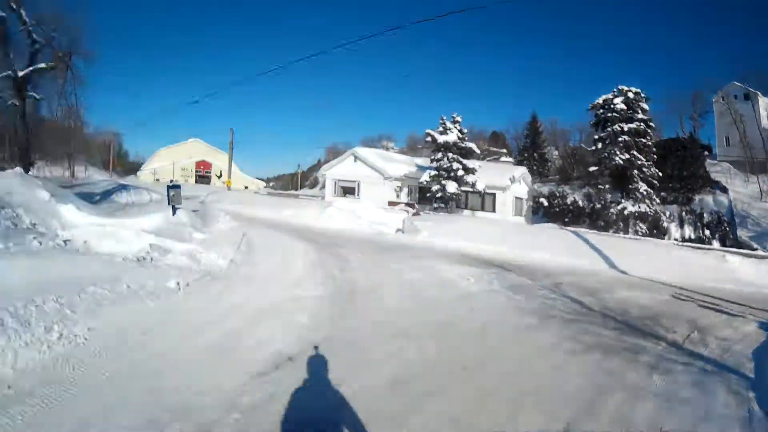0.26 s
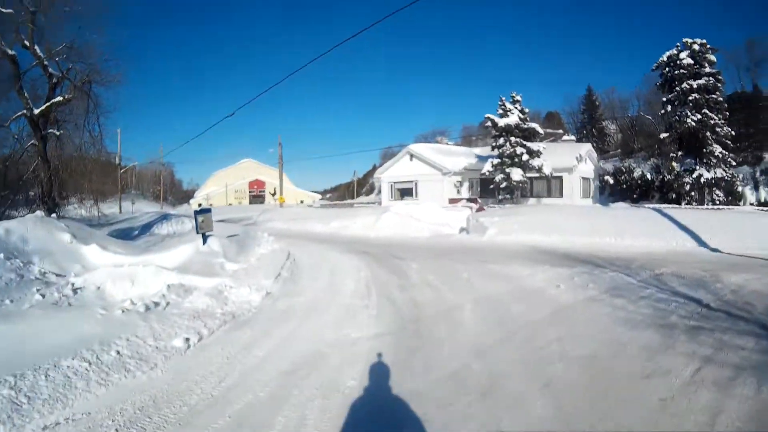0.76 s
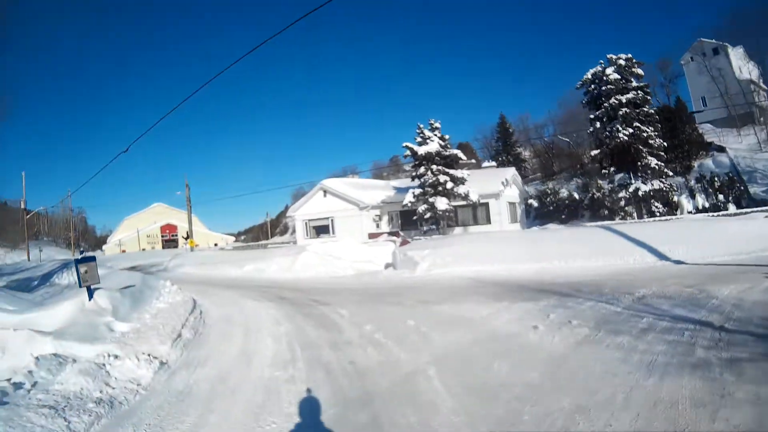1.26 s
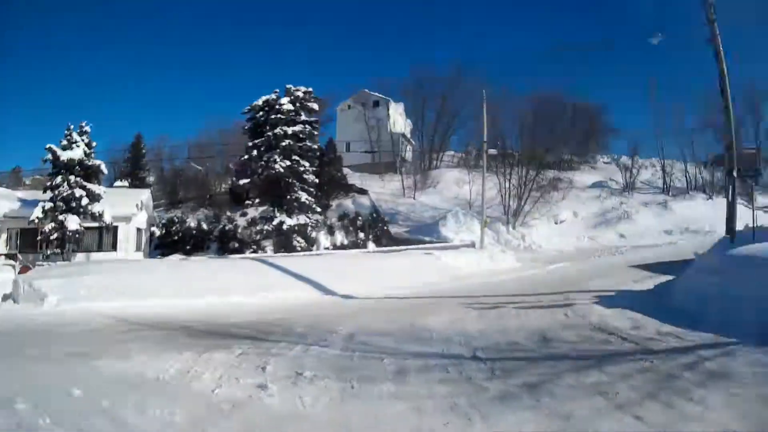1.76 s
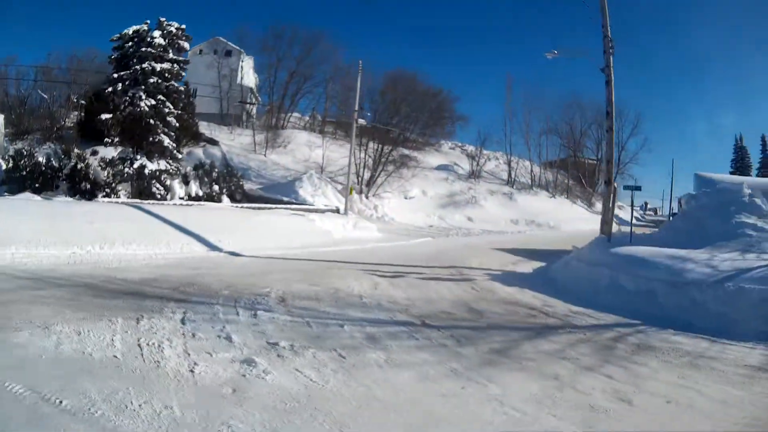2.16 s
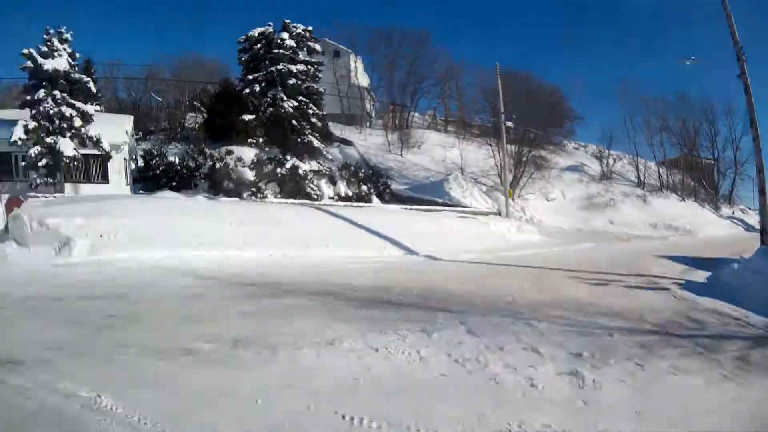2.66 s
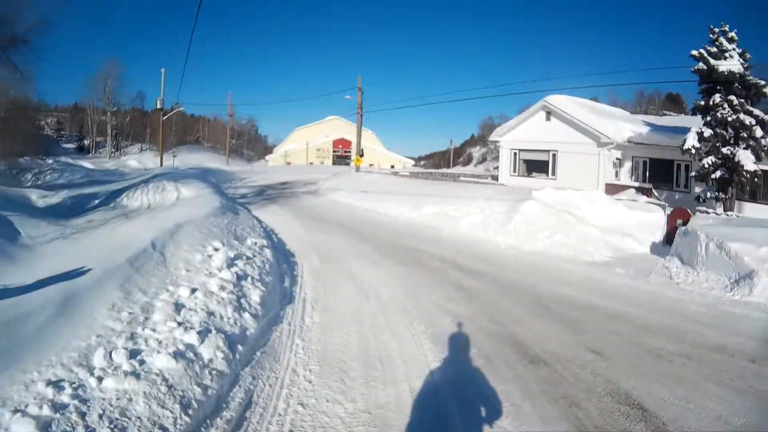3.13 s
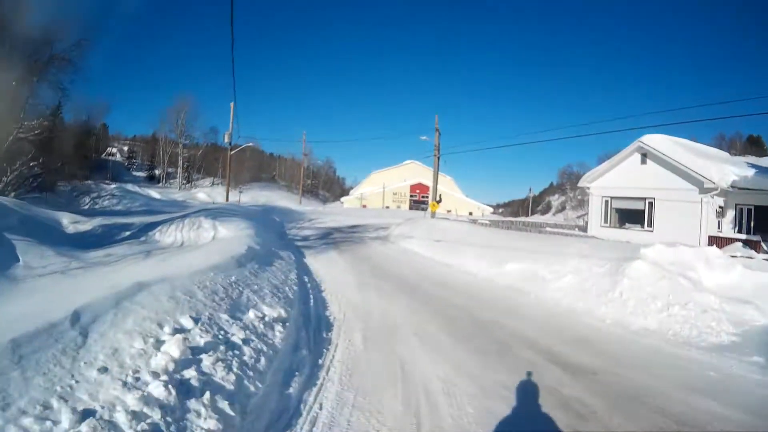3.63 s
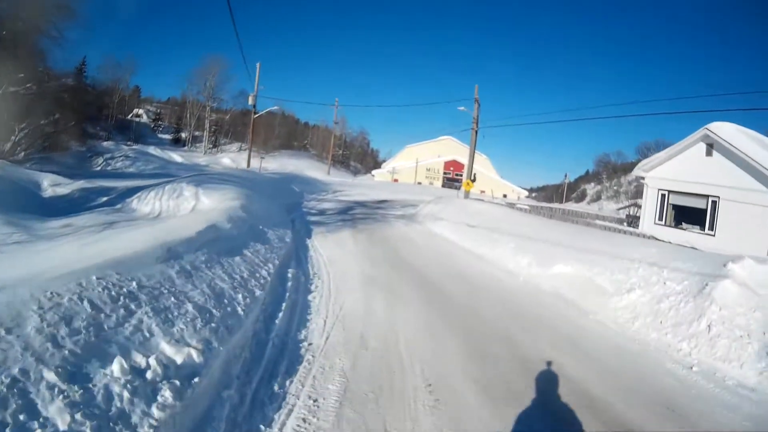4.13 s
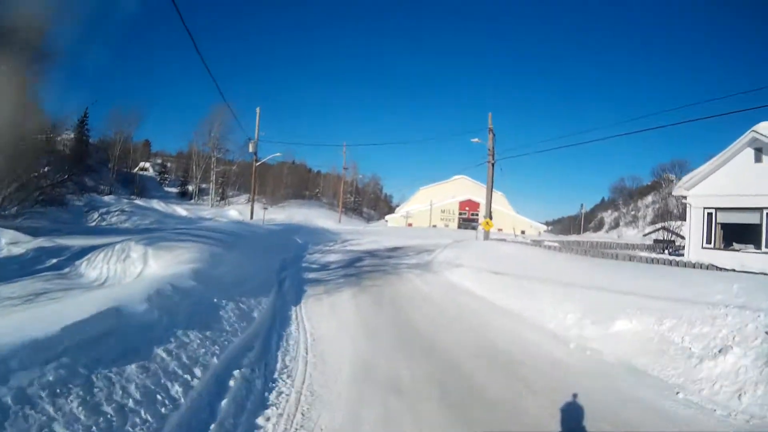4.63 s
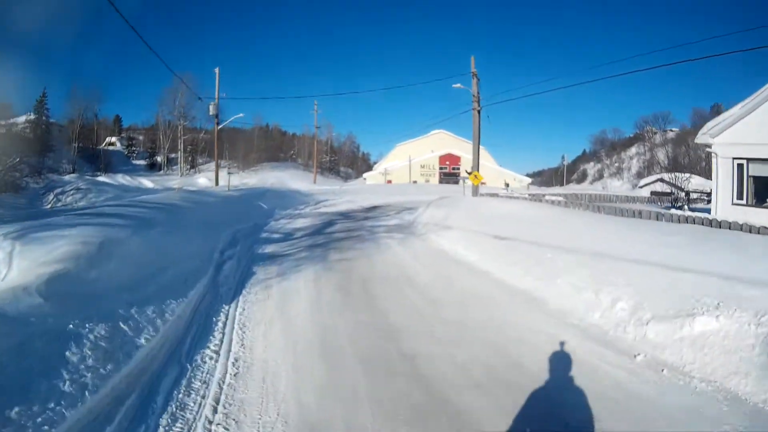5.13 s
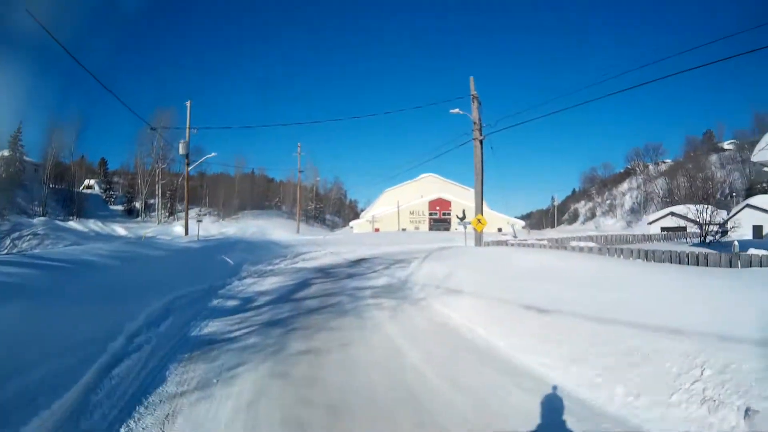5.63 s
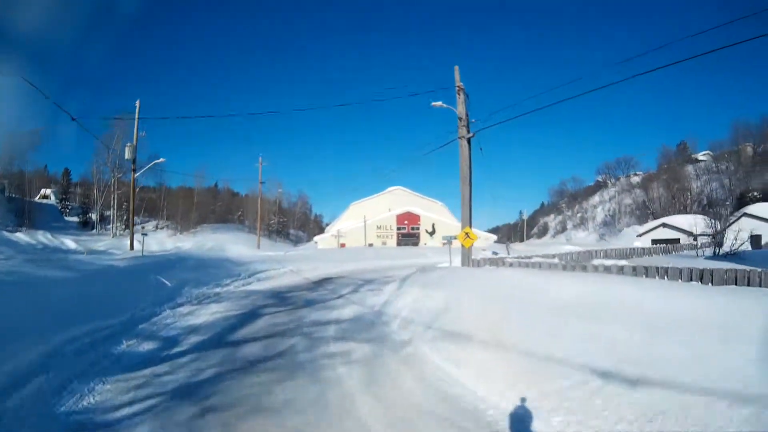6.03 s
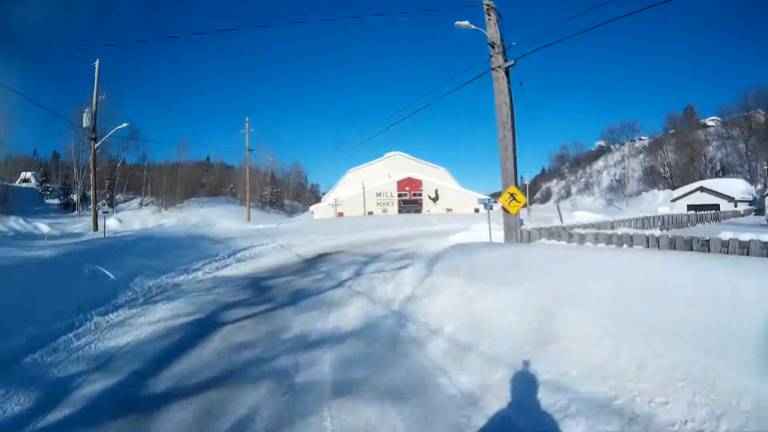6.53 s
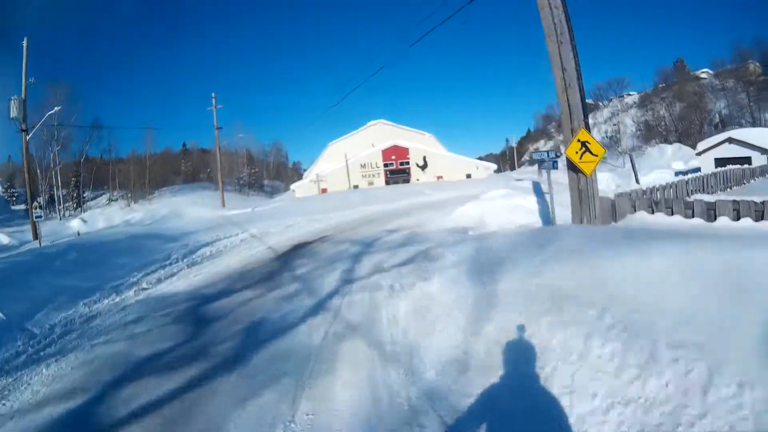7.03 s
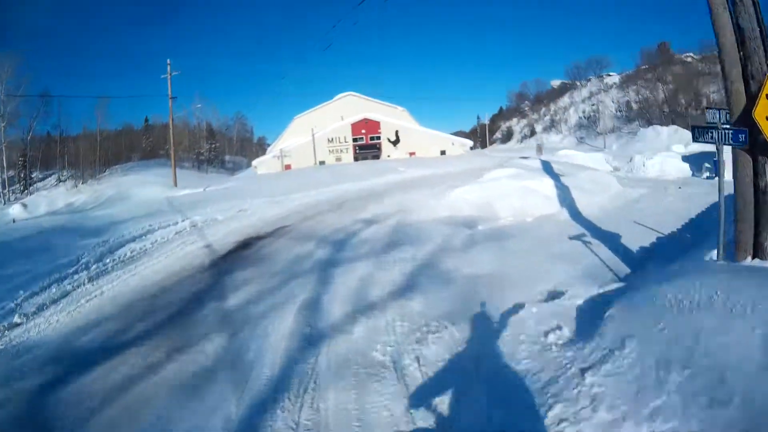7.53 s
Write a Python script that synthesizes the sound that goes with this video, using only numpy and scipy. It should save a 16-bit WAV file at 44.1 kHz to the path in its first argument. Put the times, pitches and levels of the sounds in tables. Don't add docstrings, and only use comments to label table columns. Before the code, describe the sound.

A close, wind-buffeted helmet microphone catches a raspy two-cylinder snowmobile outdoors. Low running gives way to two sharp revs, a popping coast, another rev and a steady buzzing cruise. A longer squeeze builds into the highest, loudest scream, then the note sinks into rough, loose firing with a few heavy backfires. Rumbling track, fan whine, bright mechanical hiss, rushing snow and tiny grit ticks surround it.

```python
import sys
import numpy as np
from scipy import signal
from scipy.fft import rfft, irfft
from scipy.io import wavfile
from scipy.ndimage import uniform_filter1d

SR = 44100
rng = np.random.default_rng(int(sys.argv[2]) if len(sys.argv) > 2 else 0)


def digitize_waveform(pressure):
    field = np.atleast_2d(pressure).T
    bounded = np.clip(field, -1, 1)
    quanta = np.round(bounded * 32767).astype(np.int16)
    wavfile.write(sys.argv[1], SR, quanta)


def ratio_of_db(decibels):
    return 10 ** (np.asarray(decibels, float) / 20)


N = 343098

# (time [s], exhaust level [dB], bite of the firing [0-1])
EFFORT = [(0, -38.5, 0.77), (.35, -35, 0.72), (.5, -27, 0.64), (.8, -28, 0.87), (1.1, -23, 0.9),
          (1.3, -26.5, 0.88), (1.6, -29, 0.82), (1.8, -30, 0.26), (2.5, -35, 0.25), (2.74, -27, 0.7),
          (3.0, -27, 0.93), (3.5, -26, 0.62), (4.4, -27, 0.82), (5.0, -23.5, 0.75), (5.55, -23, 0.98),
          (5.82, -20, 0.63), (6.3, -23.5, 0.79), (7.78, -25.5, 0.54)]
BURN_ON_S = .05


def engine(turns):
    wander = ratio_of_db(3.5 + .8 * drift(25))
    return exhaust(turns) + wander * (fan(turns) - intake(turns)) + drone(turns) + pops()


def exhaust(turns):
    order_db = {4: 2.5, 5: -.5, 6: .5, 7: 1.2, 8: 1.7, 10: -5, 11: 1.5, 12: 1.5, 13: 2.5, 14: -1.5}
    levels = {k: order_db.get(k, 0) for k in range(4, 22) if k != 9}
    load = throttle() * np.clip((190 - crank()) / 18, 0, 1)
    loaded = load * (.8 * np.cos(14 * np.pi * turns) - .2 * np.cos(12 * np.pi * turns))
    fifth = 1.3 * coasting() * np.cos(10 * np.pi * turns)
    steady = pipe(orders(turns, levels, wander_db=1.2) + loaded + fifth)
    even = steady + .6 * pipe(steady)
    third = pipe(ratio_of_db(4) * np.cos(6 * np.pi * turns))

    gas = rng.standard_normal(N) * ratio_of_db(.9 * drift(14))
    rough = .39 * rms_one(pipe(firings(turns, spread_db=2.5))) + rms_one(pipe(gas))

    uneven, lower_db = unevenness(), exhaust_db()
    upper_db = lower_db - 9.5 + 7.5 * bite() + 4 * throttle(BURN_ON_S)
    note = 0
    for part, edge_hz, level_db in ((low_pass, 700, lower_db), (high_pass, 880, upper_db)):
        clean = evened(part(even, edge_hz), .06, whole=part(even + third, edge_hz))
        noisy = evened(part(rough, edge_hz), .12)
        note = note + ratio_of_db(level_db) * (np.sqrt(1 - uneven) * clean + np.sqrt(uneven) * noisy)
    return note


def pipe(x):
    # (frequency [Hz], width [Hz], level [dB])
    modes = [(474, 188, 5), (617, 280, 1.5), (1069, 159, 0), (1446, 172, -3.5), (1731, 250, -9.5),
             (780, 320, -8.5)]
    rung = sum((-1) ** k * ratio_of_db(db) * resonance(x, hz, width) for k, (hz, width, db) in enumerate(modes))
    return band(rung, 406, 1960)


def intake(turns):
    # (frequency [Hz], level [dB])
    shut = [(85, -35.5), (105, -32), (130, -26.5), (170, -23.5), (205, -31), (250, -32.5), (350, -39.5),
            (600, -26)]
    # (frequency [Hz], level [dB])
    wide_open = [(100, -18.5), (140, -7.5), (200, -11.5), (240, -25.5), (290, -22.5), (340, -14),
                 (410, -16.5), (600, -15)]
    opening, rate = throttle(), crank()
    boom = 0
    for k in range(1, 4):
        shut_db = at_hz(shut, k * rate) + 1.5 * drift(4.9)
        open_db = at_hz(wide_open, k * rate) - 5 * (k > 2)
        level_db = (1 - opening) * shut_db + opening * open_db
        boom = boom + ratio_of_db(level_db) * np.sin(2 * np.pi * k * (turns - .42))
    return boom


def fan(turns):
    # (frequency [Hz], level [dB])
    shroud = [(760, -47), (860, -48), (930, -33.5), (1050, -31.5), (1130, -27.5), (1270, -34),
              (1500, -32.5), (1800, -33.5)]
    # (time [s], level re fan [dB])
    whistle = [(0, -32), (4.05, -32), (4.2, -15), (4.42, -15), (4.5, -24), (4.6, -15), (4.75, -20),
               (4.9, -32), (7.78, -32)]
    level_db = at_hz(shroud, crank() * 9) - 14 * (unevenness() - .25)
    level_db = level_db + 6.5 * (bite() - .8) + 2 * throttle()
    overtone = ratio_of_db(in_time(whistle)[0]) * np.sin(36 * np.pi * turns)
    return ratio_of_db(level_db) * (np.sin(18 * np.pi * turns) + overtone)


def drone(turns):
    return coasting() * ratio_of_db(exhaust_db() - 12 + 2 * drift(7)) * np.sin(10 * np.pi * turns)


def pops():
    # (time [s], peak level [dB])
    bangs = [(1.18, -5), (1.221, -1), (2.018, -9), (2.086, -3), (2.094, -8), (2.17, -8), (2.198, -5),
             (2.249, -9), (2.319, -7), (2.349, -15), (2.369, -19), (2.54, -12), (2.601, -8), (2.662, -9.5),
             (6.72, -20), (7.02, 1), (7.18, -0.5), (7.449, -5)]
    burst = low_pass(clicks_at(bangs), 1750)
    return ratio_of_db(22.5) * pipe(burst) + ratio_of_db(23) * resonance(burst, 140, 180)


def rasp(turns):
    fired = np.diff(np.floor(turns - .33), prepend=-1) > 0
    strength_db = -3.5 + 1.5 * rng.standard_normal(N) + 3 * drift(15)
    cracks = fired * throttle() ** 4 * ratio_of_db(strength_db) + 1e-18
    return low_pass(high_pass(cracks, 2100), 3900) + ratio_of_db(-27) * high_pass(cracks, 8000)


def crank():
    # (time [s], firing rate [1/s])
    clutch = [(0, 83.8), (.34, 85.8), (.61, 100.8), (.99, 130), (1.16, 133.3), (1.59, 124), (2.07, 104.5),
              (2.51, 97.7), (2.66, 98.9), (3.21, 124.3), (4.37, 131), (4.9, 155.3), (5.18, 178.4),
              (5.5, 167.9), (6.01, 135), (6.41, 125.8), (6.87, 123), (7.78, 92)]
    # (start [s], peak [s], extra firing rate [1/s])
    surges = [
        (.53, .762, 23.3),
        (.879, 1.1, 25),
        (2.73, 2.975, 32),
        (4.969, 5.127, 14.4),
        (5.16, 5.41, 39.3),
    ]
    pull_back_s, flywheel_s = .097, .07
    t, rate = np.arange(N) / SR, in_time(clutch)[0]
    for start, peak, extra in surges:
        climb = np.clip((t - start) / (peak - start), 0, 1)
        rate = rate + extra * climb * np.exp(-np.maximum(t - peak, 0) / pull_back_s)
    return uniform_filter1d(rate, size=int(flywheel_s * SR), mode="nearest")


def throttle(linger_s=0):
    # (starts [s], fully there [s], lets go [s], opening [0-1])
    presses = [
        (0.502, 0.673, 0.7, 0.87),
        (0.82, 0.912, 1.016, 0.89),
        (2.677, 2.816, 2.925, 0.98),
        (3.2, 3.45, 3.6, 0.09),
        (4.1, 4.64, 4.83, 0.6),
        (4.835, 4.932, 5.1, 0.92),
        (5.02, 5.256, 5.36, 0.99),
        (5.493, 5.624, 5.78, 0.35),
        (6.053, 6.19, 6.15, 0.23),
    ]
    t, let_go_s = np.arange(N) / SR, .06
    openings = []
    for on, full, off, top in presses:
        shutting = off + linger_s
        openings.append(top * np.interp(t, [on, full, shutting, shutting + let_go_s], [0, 1, 1, 0]))
    return np.clip(np.max(openings, axis=0), 0, 1)


def unevenness():
    # (time [s], uneven share of the exhaust power [0-1])
    off_throttle = [(0, .5), (.45, .35), (1.3, .3), (2.6, .27), (3.2, .28), (5.65, .33), (6.9, .36),
                    (7.05, .9), (7.78, .93)]
    # (time [s], relative length [1])
    stumbles = [
        (1.16, 1.0),
        (3.05, 1.0),
        (5.5, 1.4),
    ]
    t, burn = np.arange(N) / SR, np.minimum(1.3 * throttle(BURN_ON_S), 1)
    stumble = sum(.36 * np.exp(-((t - s) / (long * .06)) ** 2) for s, long in stumbles)
    return np.clip(in_time(off_throttle)[0] * (1 - burn) + .12 * burn + stumble, 0, 1)


def exhaust_db():
    return in_time(EFFORT)[0] + 4.5 * throttle(BURN_ON_S)


def bite():
    return in_time(EFFORT)[1]


def coasting():
    # (time [s], share [0-1])
    shut = [(0, 0), (1.1, 0), (1.25, 1), (2.65, 1), (2.8, 0), (7.78, 0)]
    return in_time(shut)[0]


def road_level():
    # (time [s], level re cruise [dB])
    road = [(0, -7.5), (.2, -4.5), (.9, -4.5), (1.5, -1.5), (2.0, -4.5), (2.7, -6), (3.1, 0), (4.3, 0),
            (4.8, -0.5), (5.2, 4.5), (6.0, 3), (7.0, 5.5), (7.78, 2.5)]
    return in_time(road)[0]


def rumble(turns):
    # (frequency [Hz], level [dB])
    colour = [(70, -9), (100, -3.5), (130, 2.5), (180, -0.3), (250, -5), (350, -8.5), (450, -8.5),
              (700, -20.5), (1200, -32.5)]
    thuds, road_db = rms_one(band(firings(turns, spread_db=1.2), 90, 380)), road_level()
    body = coloured(colour) + .5 * thuds
    body = body + (ratio_of_db(.54 * road_db) - 1) * resonance(body, 374, 220)
    return ratio_of_db(-21.5 + .97 * road_db + .48 * throttle() + 1.1 * drift(5)) * body


def hiss(turns):
    # (frequency [Hz], level [dB])
    colour = [(1500, 10), (2100, 2.5), (2800, -5), (3400, -9.5), (4000, -8), (5250, -12.5), (6150, -22.5),
              (6600, -19), (7900, -23), (9150, -32), (9700, -30), (11500, -37.5), (14500, -45),
              (15700, -52.5)]
    load, road_db, rate = throttle(), road_level(), crank()
    level_db = -43 + .45 * (exhaust_db() + 26) + .18 * road_db + 4 * load ** 3
    level_db = level_db + .85 * 20 * np.log10(rate / 129)
    top_db = -31 + 17.5 * bite() - .27 * road_db - .5 * load ** 3
    top_db = top_db + .52 * 20 * np.log10(np.maximum(rate / 128, 1))

    gate = ratio_of_db((.8 + 2.2 * load) * np.cos(2 * np.pi * turns + .8) + 1.2 * load * drift(90))
    noise = evened(coloured(colour) * gate, .055) * ratio_of_db(.59 * drift(57))
    dull = np.clip(1.3 - 2 * bite(), 0, 1)
    idle = dull * (ratio_of_db(7.5) * resonance(noise, 6190, 640) - .55 * resonance(noise, 3670, 900))
    idle = idle - .6 * dull * resonance(noise + idle, 7500, 1600)
    top = ratio_of_db(top_db - 4 * dull + 23.5) * high_pass(noise, 5470)
    edge = ratio_of_db(.4 * (level_db + 38.5) + 1.5 * drift(60)) * high_pass(top, 14900)
    return ratio_of_db(level_db + 5) * (low_pass(noise + idle, 5800) + low_pass(top, 13050) + edge)


def wind():
    # (frequency [Hz], level [dB])
    colour = [(12, -21.5), (30, -9.5), (50, -6.5), (75, -8.5), (110, -7.5), (200, -18), (500, -22.5),
              (1200, -24), (2500, -50.5)]
    level_db = -23 + .76 * road_level() + 1.44 * drift(3.7) + .47 * drift(22)
    return ratio_of_db(level_db) * coloured(colour)


def spray():
    # (time [s], level [dB])
    thick = [(4.61, 4), (6.07, 5), (6.18, 0), (7.02, 1.5), (7.11, 5), (7.19, 5), (7.34, 3), (7.47, 6)]
    t, clump_s = np.arange(N) / SR, .023
    thick_db = sum(db * np.exp(-((t - s) / clump_s) ** 2) for s, db in thick)
    clumps = ratio_of_db(thick_db + 1.1 * drift(11) + 2.9 * drift(76))
    rush = rms_one(low_pass(band(rng.standard_normal(N), 900, 2430), 5200))
    return ratio_of_db(-47 + 2.3 * road_level()) * clumps * rush


def ticks():
    # (time [s], peak level [dB])
    contacts = [(4.705, -49), (5.484, -46), (5.513, -53), (5.652, -49), (5.7845, -45.5), (6.0708, -58),
                (6.5193, -45.5), (6.7278, -57), (6.852, -40), (6.9174, -57.5), (7.0541, -52), (7.181, -46),
                (7.2352, -56), (7.4741, -46.5), (7.5734, -51.5)]
    return ratio_of_db(13.5) * band(clicks_at(contacts), 5000, 15000)


def firings(turns, spread_db):
    fired = np.diff(np.floor(turns), prepend=0) > 0
    return fired * rng.standard_normal(N) * ratio_of_db(spread_db * rng.standard_normal(N)) + 1e-18


def orders(turns, levels, wander_db):
    return sum(ratio_of_db(db + wander_db * drift(6.3)) * np.cos(2 * np.pi * k * turns) for k, db in levels.items())


def clicks_at(events):
    out = np.full(N, 1e-18)
    for s, peak_db in events:
        out[round(s * SR)] = ratio_of_db(peak_db)
    return out


def coloured(points):
    hz, level_db = np.transpose(points)
    grid = np.maximum(np.arange(N // 2 + 1) * SR / N, 1)
    shape = ratio_of_db(np.interp(np.log(grid), np.log(hz), level_db, left=-90, right=-90))
    return rms_one(irfft(rfft(rng.standard_normal(N)) * shape, N))


def drift(rate):
    r = np.exp(-80 * np.pi * rate / SR)
    slow = signal.lfilter([1], [1, -2 * r, r * r], rng.standard_normal(N // 40 + 2002))[2000:]
    return np.interp(np.arange(N) / 40, np.arange(len(slow)), rms_one(slow))


def rms_one(x):
    return x / np.sqrt(np.mean(x ** 2) + 1e-20)


def evened(x, seconds, whole=None):
    whole = x if whole is None else whole
    return x / np.sqrt(uniform_filter1d(whole ** 2, size=int(seconds * SR)) + 1e-12)


def in_time(rows):
    s, *columns = np.transpose(rows)
    return [np.interp(np.arange(N) / SR, s, c) for c in columns]


def at_hz(points, hz):
    table_hz, level_db = np.transpose(points)
    return np.interp(np.log(hz), np.log(table_hz), level_db)


def resonance(x, hz, width):
    r = np.exp(-np.pi * width / SR)
    poles = [1, -2 * r * np.cos(2 * np.pi * hz / SR), r * r]
    return signal.lfilter([(1 - r * r) / 2, 0, (r * r - 1) / 2], poles, x)


def band(x, low_hz, high_hz):
    return signal.sosfilt(signal.butter(2, [low_hz, high_hz], "band", fs=SR, output="sos"), x)


def low_pass(x, hz):
    return signal.sosfilt(signal.butter(4, hz, fs=SR, output="sos"), x)


def high_pass(x, hz):
    return signal.sosfilt(signal.butter(4, hz, "high", fs=SR, output="sos"), x)


def scene():
    turns = np.cumsum(crank() * (1 + .002 * drift(8))) / SR
    near = engine(turns) + rumble(turns) + wind()
    near = near - .55 * coasting() * resonance(near, 780, 180)
    return (near + hiss(turns) + ticks() + spray() + rasp(turns))[None]


def band_limit(x):
    return signal.sosfilt(signal.butter(12, 15720, fs=SR, output="sos"), x)


def record(dry):
    overload = .72
    hissy = dry + ratio_of_db(-76) * rng.standard_normal(N)
    flattened = hissy / (1 + np.abs(hissy / overload) ** 24) ** (1 / 24)
    return band_limit(flattened)


dry = scene()
out = record(dry)
digitize_waveform(out)
```